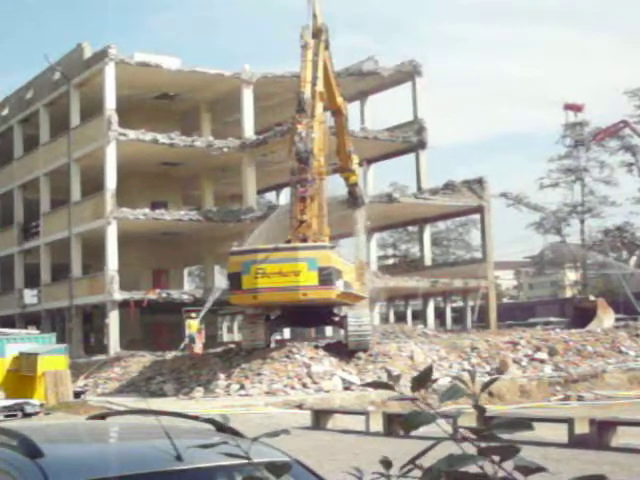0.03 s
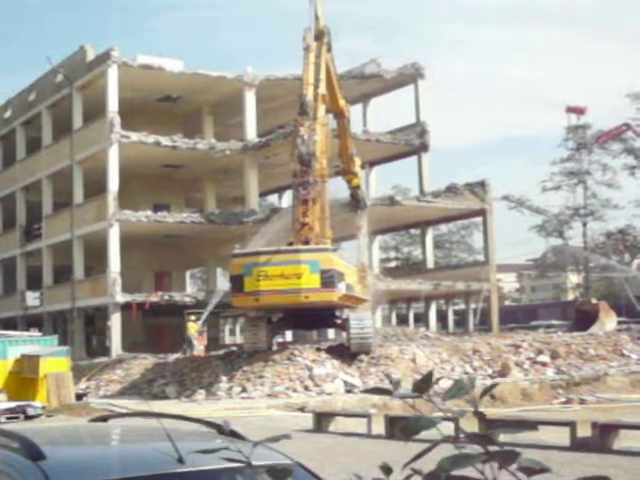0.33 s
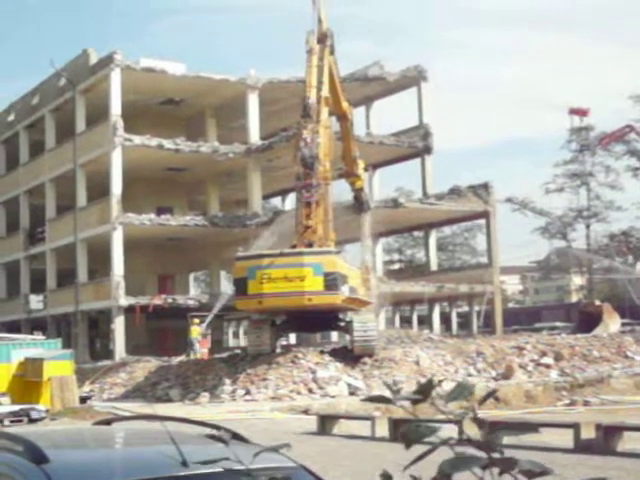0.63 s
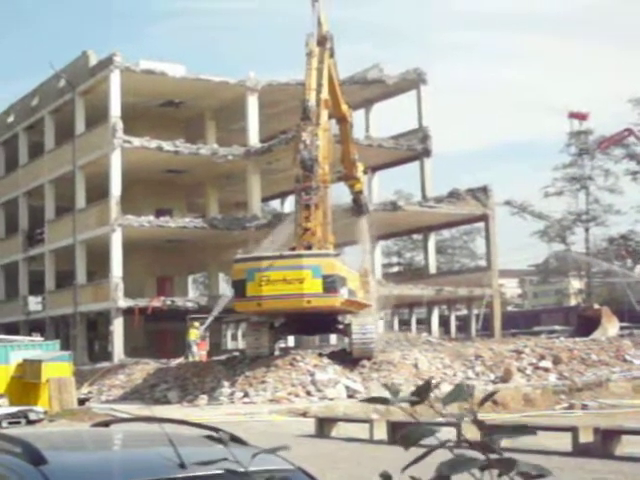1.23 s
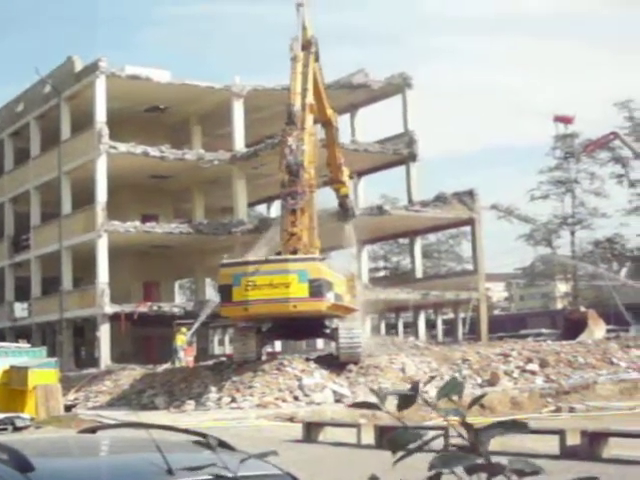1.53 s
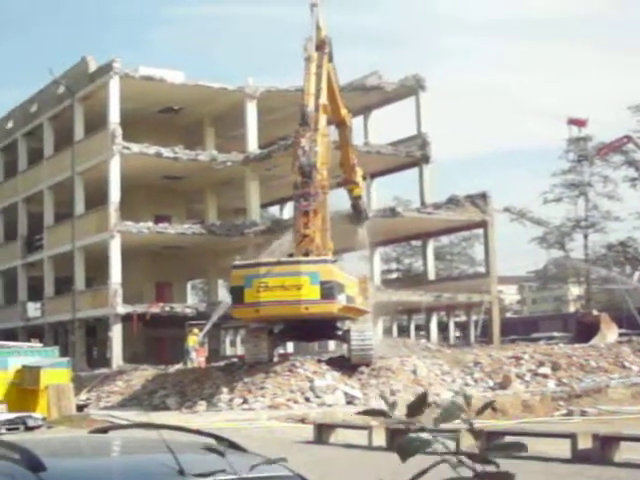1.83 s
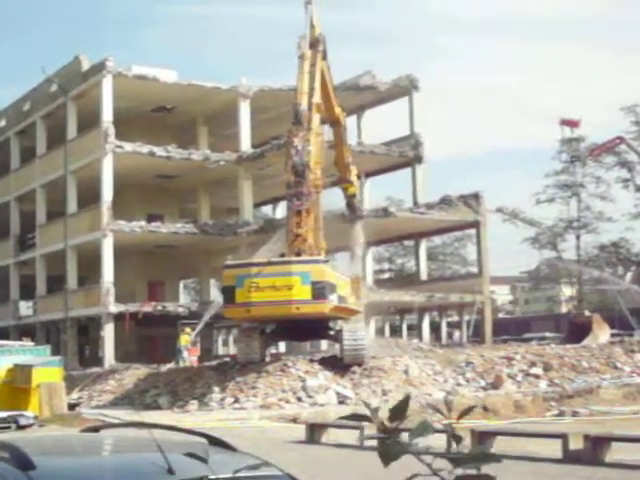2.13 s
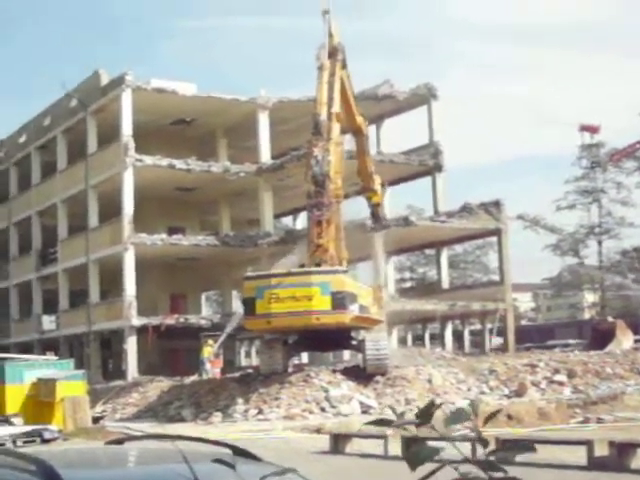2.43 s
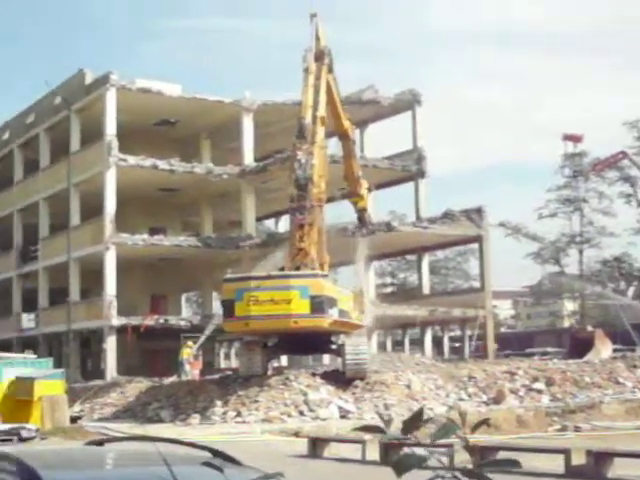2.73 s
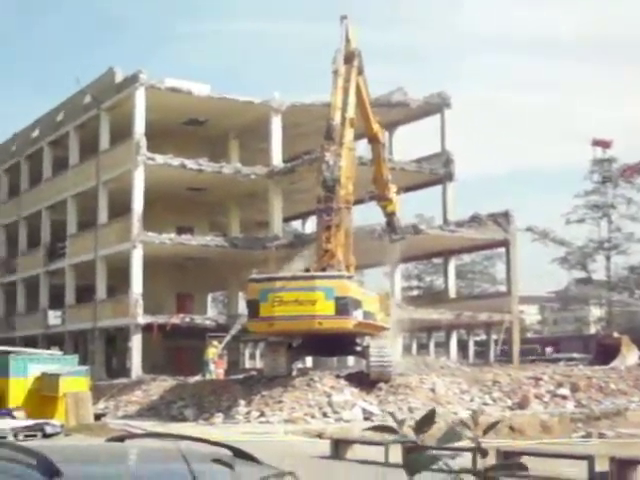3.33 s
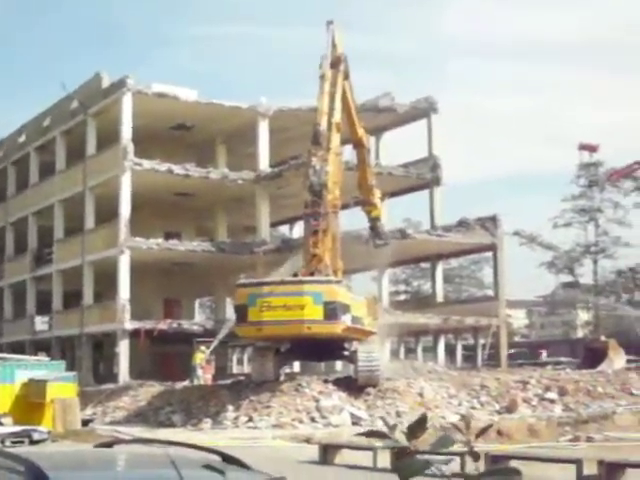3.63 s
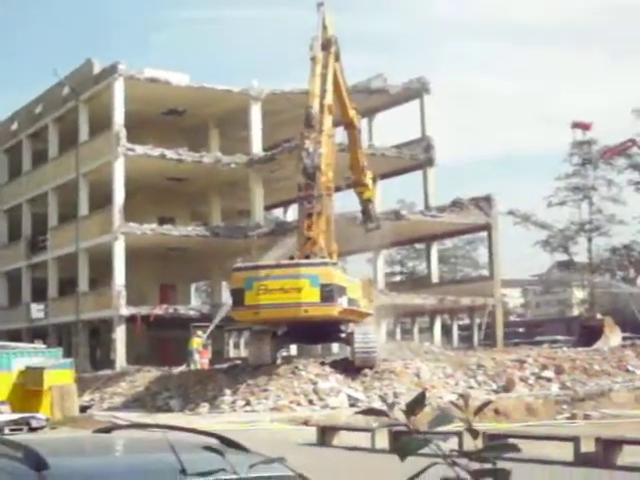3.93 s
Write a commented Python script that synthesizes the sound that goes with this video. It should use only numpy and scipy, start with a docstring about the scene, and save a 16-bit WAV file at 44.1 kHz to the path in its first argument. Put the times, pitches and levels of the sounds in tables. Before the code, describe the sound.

A big diesel excavator booms and clatters throughout over a low site rumble, revving slightly around 1 second. A broad roar, like sliding debris or traffic, peaks with a concrete crack at 0.4 seconds and again at 1.6. The arm squeals briefly at 1 second. Rubble clinks on steel, mostly after 2.2 seconds, and something clicks nearby at 2.5. The dull microphone overloads on the loudest peaks.

```python
"""Excavator on a concrete building

A big diesel excavator works, its exhaust booming as the load comes and goes; its arm squeals once.
A broad roar, of traffic or sliding debris, is there at the start and then surges twice. Rubble and
reinforcing steel clink in the open floors, and something clicks nearby. A small camera's
narrow-band microphone hears it all and overloads on the loudest peaks."""
import sys
import numpy as np
from scipy import signal
from scipy.fft import rfft, irfft
from scipy.io import wavfile
from scipy.ndimage import uniform_filter1d

SR = 44100
rng = np.random.default_rng(int(sys.argv[2]) if len(sys.argv) > 2 else 0)


def unload_wav(signal):
    """Save mono or channel-first audio to the path in sys.argv[1] as 16-bit WAV at rate SR, clipped to [-1, 1]."""
    wavfile.write(
        sys.argv[1],
        SR,
        np.round(np.clip(np.atleast_2d(signal).T, -1, 1) * 32767).astype(np.int16),
    )


N = 176400  # 4 seconds


def gain(db):
    """Turn decibels (dB) into a number to multiply by."""
    return 10 ** (np.asarray(db) / 20)


def normalize(x):
    """Scale a signal so its average strength (rms) is 1."""
    return x / np.sqrt(np.mean(x ** 2))


def curve(rows):
    """Join (seconds, value) points with straight lines."""
    return np.interp(np.arange(N) / SR, *np.array(rows).T)


def wobble(rate):
    """Glide smoothly to a new random value, rate times a second."""
    hold = int(SR / rate)
    steps = np.repeat(rng.standard_normal(1024), hold)[:N]
    return normalize(uniform_filter1d(uniform_filter1d(steps, hold), hold))


def noise(points):
    """Noise shaped by (Hz, dB) points, fading steeply beyond both ends."""
    hz, db = np.array(points).T
    f = np.maximum(np.fft.rfftfreq(N, 1 / SR), 1)
    shape = gain(np.interp(np.log(f), np.log(hz), db))
    shape = shape / (1 + (hz[0] / 2 / f) ** 4) / (1 + (f / 2 / hz[-1]) ** 4)
    return normalize(irfft(rfft(rng.standard_normal(N)) * shape, N))


def resonance(hz, width):
    """Noise that rings around one pitch; a smaller width rings more clearly."""
    peak = signal.iirpeak(hz, hz / width, fs=SR)
    return normalize(signal.lfilter(*peak, rng.standard_normal(N)))


def tone(phase, rough, flutter_hz):
    """A tone plus a fluttering part scattered by the walls; rough sets how much."""
    wave = (1 + rough * wobble(flutter_hz)) * np.sin(phase) + rough * wobble(flutter_hz) * np.cos(phase)
    return np.sqrt(2 / (1 + 2 * rough ** 2)) * wave


# The rumble's tone colour. Each row: frequency in Hz, relative level in dB.
RUMBLE_COLOUR = [(15,-11.5),(30,-6),(60,2.5),(120,3),(220,-1.5),(330,-1),(500,-23.5)]

def site_rumble():
    """The building site rumbles, low and steady."""
    return gain(-28) * noise(RUMBLE_COLOUR)


# The roar's swells. Each row: peak time in seconds, relative level in dB, rise and fall in dB a second.
SURGES = [(.04,-12.5,12,32),(.375,-7.2,66,29),(1.63,-13.3,75,46)]
# The roar's tone colour. Each row: frequency in Hz, relative level in dB.
ROAR_COLOUR = [(20,-8),(70,5.5),(150,-4),(300,-2),(450,-4),(700,0.5),(950,-3.5),(1200,1.5),(1500,-6.5),(2000,-12.5),(2800,-16),(3600,-18.5)]
# Pitches that ring in the roar. Each row: pitch in Hz, width in Hz, relative level in dB.
ROAR_RINGS = [(1125,15,-7),(1243,40,-9),(897,25,-15.5),(665,37,-14.5),(1426,120,-20)]

def roar():
    """Traffic or sliding debris makes a broad, ringing roar that swells and dies away."""
    t = np.arange(N) / SR
    power = sum(gain(db - np.abs(t - at) * np.where(t < at, rise, fall)) ** 2
                for at, db, rise, fall in SURGES)
    rush = noise(ROAR_COLOUR)
    rings = sum(gain(db) * resonance(hz, width) for hz, width, db in ROAR_RINGS)
    return gain(0.9) * np.sqrt(power) * normalize(rush + rings)


def concrete_crack(start_s=.345, attack_s=.018, fade_s=.39):
    """Concrete cracks in a burst of noise at the roar's biggest crest."""
    age = np.maximum(np.arange(N) / SR - start_s, 0)
    level = np.minimum(age / attack_s, 1) * gain(-11 - 60 * age / fade_s)
    return level * noise([(1000, -2.5), (1700, 12), (2600, -7), (3700, -5)])


# Rubble hitting steel. Each row: start in seconds, level in dB, pitch in Hz, seconds to fade by 60 dB.
CLINKS = [(.85,-25.5,3620,0.18),(1.145,-29,2660,0.11),(1.18,-26.5,2950,0.065),(1.26,-29,3320,0.087),(1.465,-30.5,2990,0.051),(2.222,-24,3330,0.091),(2.275,-26.5,2920,.2),(2.30,-26,3200,.1),(2.355,-28.5,2910,0.36),(2.43,-33,2880,0.24),(2.629,-20,3530,0.083),(2.787,-17.5,3400,0.032),(2.854,-22,3390,0.21),(2.867,-21.5,3433,0.095),(2.891,-15,3428,0.18),(2.913,-22.5,3620,0.12),(2.955,-21.5,3610,0.092),(2.966,-25.5,2785,0.39),(3.071,-27.5,2870,0.28),(3.155,-23,3246,0.15),(3.19,-28,2645,.2),(3.224,-27,2890,0.06),(3.30,-25,2760,0.08),(3.335,-27.5,2790,0.29),(3.58,-28.5,3530,0.13),(3.68,-26,3300,.07),(3.793,-30,2710,0.068)]
# The tones of a struck bar. Each row: multiple of the clink's pitch, relative level in dB.
BAR_TONES = [(.4,-7),(.635,-12.5),(.8,-8.5),(.935,-10.5),(1.001,-0.5),(1.055,-7)]

def rubble(attack_s=.0007, echo_s=.65):
    """Falling pieces crunch and set steel bars ringing; the open floors echo them."""
    t = np.arange(N) / SR
    grit = gain(-3.5) * noise([(700, -15.5), (1400, 0), (2200, -9.5), (3000, -1.5), (3800, -2.5)])
    hits = np.zeros(N)
    for at, db, hz, fade_s in CLINKS:
        start = int(at * SR)
        age = t[:min(SR // 2, N - start)]
        span = slice(start, start + len(age))
        ring = sum(np.sqrt(2) * gain(tone_db) * np.sin(2 * np.pi * (hz * ratio * age + rng.random()))
                   for ratio, tone_db in BAR_TONES)
        level = gain(db - 60 * age / fade_s) * (1 - np.exp(-age / attack_s))
        hits[span] += level * (ring + grit[span])
    echo = rng.standard_normal(SR) * gain(-60 * t[:SR] / echo_s)
    echo /= np.sqrt(np.sum(echo ** 2))
    return hits + gain(-8) * signal.fftconvolve(hits, echo)[:N]


def click(at_s=2.4795, width_s=.0005, tick_hz=3950, ring_hz=3530, fade_s=.05):
    """Something close by ticks once and rings briefly, with no echo."""
    t = np.arange(N) / SR - at_s
    tick = gain(-3.5) * np.exp(-(t / width_s) ** 2) * np.sin(2 * np.pi * tick_hz * t)
    age = np.maximum(t, 0)
    ring = gain(-23.5 - 60 * age / fade_s) * np.sin(2 * np.pi * ring_hz * age)
    return tick + ring


def arm_squeal(peak_s=1.01, width_s=.038, hz=943, fall_hz_per_s=700):
    """The working arm gives a short squeal that falls in pitch."""
    t = np.arange(N) / SR - peak_s
    phase = 2 * np.pi * np.cumsum(hz - fall_hz_per_s * t) / SR
    level = gain(-25) * np.exp(-(t / width_s) ** 2 / 2)
    return level * tone(phase, rough=.88, flutter_hz=60.6)


# Pitches at which the housing rings. Each row: pitch in Hz, width in Hz, level in dB.
HOUSING_RINGS = [(282,7.6,-31.5),(367.5,8.5,-37.5),(554.7,13,-36.5),(669,19,-39)]

def housing():
    """The machine's housing rings at a few fixed pitches."""
    return sum(gain(db) * resonance(hz, width) for hz, width, db in HOUSING_RINGS)


# The tone colour of the clatter and fan. Each row: frequency in Hz, relative level in dB.
CLATTER_COLOUR = [(300,-7.5),(370,-6),(450,-9),(540,2.5),(640,-5.5),(760,-2.5),(900,-3.5),(1080,0.5),(1300,-4),(1600,-8.5),(2200,-13),(2900,-12),(3600,-14)]

def clatter(phase):
    """Clatter and fan noise pulse with each firing and flicker slightly in level."""
    flicker = gain(.6 * wobble(18))
    pulse = 1 + .15 * np.cos(phase)
    return gain(-21.5) * noise(CLATTER_COLOUR) * pulse * flicker


# How loud four engine tones are over time. Each row: time in seconds, relative level in dB.
BOOM_LEVEL = [(0.0, -8.5), (0.05, -17), (0.17, -6), (0.32, -9), (0.37, -20), (0.4, -17), (0.43, -29),
              (0.5, -12.5), (0.59, -12.5), (0.67, -11.5), (0.72, -29), (0.79, -14), (0.87, -18),
              (0.95, -13.5), (1.02, -14.5), (1.2, -16.5), (1.32, -25.5), (1.4, -11), (1.46, -10),
              (1.68, -8.5), (2.09, -8), (2.62, -15.5), (2.78, -14.5), (3.03, -20.5), (3.09, -19.5),
              (3.17, -10), (3.35, -7.5), (3.46, -20), (3.54, -9), (3.69, -7), (3.98, -10.5), (4.0, -9)]
SECOND_LEVEL = [(0.0, -24.5), (0.23, -32), (0.33, -26), (0.47, -36.5), (0.49, -23), (1.07, -41.5),
                (1.97, -25.5), (2.08, -28.5), (2.53, -24), (3.31, -36.5), (3.33, -29), (4.0, -26)]
THIRD_LEVEL = [(0.0, -36), (0.05, -17.5), (0.15, -41), (0.27, -15), (0.5, -45), (1.11, -13.5), (1.3, -44),
               (1.56, -19.5), (1.59, -34), (2.32, -33.5), (2.41, -19), (2.58, -37), (3.35, -18.5),
               (3.56, -36), (3.66, -20.5), (4.0, -30.5)]
WHINE_LEVEL = [(0.0, -23.5), (0.76, -18), (1.0, -30), (1.07, -19), (1.24, -20.5), (1.26, -24.5),
               (1.95, -28.5), (2.04, -18.5), (2.32, -31), (2.49, -33), (2.55, -53), (2.83, -45),
               (3.03, -21), (3.16, -35), (3.25, -21), (3.68, -31), (3.71, -26), (4.0, -22.5)]
# Weaker engine tones. Each row: multiple of the firing rate, level in dB.
OVERTONES = [(1.5,-47.5),(2.5,-46),(3.5,-49),(4,-43),(4.5,-40),(5,-44.5),(5.5,-45),(7,-40),(8,-39.5),(9,-38.5),(10.5,-38.5),(12,-37.5),(13,-38),(15,-37)]

def engine_tones(phase):
    """The exhaust booms at the firing rate; a whine and other tones waver at multiples of it."""
    tones = gain(curve(BOOM_LEVEL) + .3) * tone(phase, rough=.069, flutter_hz=12)
    tones += gain(curve(SECOND_LEVEL) + 3) * tone(2 * phase, rough=.22, flutter_hz=22)
    tones += gain(curve(THIRD_LEVEL) - 3.5) * tone(3 * phase, rough=.36, flutter_hz=20)
    tones += gain(curve(WHINE_LEVEL) - .6) * tone(6 * phase, rough=.28, flutter_hz=20)
    for multiple, db in OVERTONES:
        tones += gain(db) * tone(multiple * phase, rough=1, flutter_hz=14)
    return tones


# How fast the engine runs. Each row: time in seconds, firings per second.
FIRING_RATE = [(0.0, 86.0), (0.17, 84.9), (0.35, 86.1), (0.62, 86.4), (0.78, 91.1), (0.9, 92.9),
               (1.05, 92.7), (1.24, 91.2), (1.38, 86.1), (1.58, 84.7), (2.0, 86.1), (2.5, 87.6),
               (2.97, 89.2), (3.12, 86.6), (3.27, 84.0), (3.46, 85.9), (3.64, 84.4), (4.0, 86.9)]

def engine():
    """The diesel's cylinders fire in turn, setting the pace of its tones and clatter."""
    rate = uniform_filter1d(curve(FIRING_RATE), size=2205)  # smoothed over 0.05 seconds
    phase = 2 * np.pi * np.cumsum(rate) / SR  # one full turn per firing
    return engine_tones(phase) + housing() + clatter(phase)


def scene():
    """Add the machine, the site and the debris together in one channel."""
    mix = engine() + site_rumble() + arm_squeal() + roar() + concrete_crack() + rubble() + click()
    return mix[None]


def record(dry, treble_hz=3587, band_edge_hz=4350, top_hz=15900, knee=.55, headroom=.22, limit=.7046):
    """The small microphone loses the high treble and squashes the loudest peaks."""
    x = signal.sosfilt(signal.butter(14, treble_hz, fs=SR, output="sos"), dry)
    excess = np.maximum(np.abs(x) - knee, 0)  # only the part above the knee is rounded off
    x = np.clip(x, -knee, knee) + np.sign(x) * headroom * np.tanh(excess / headroom)
    x = signal.sosfiltfilt(signal.ellip(8, .1, 60, band_edge_hz, fs=SR, output="sos"), x)
    x = np.clip(x, -limit, limit)  # whatever still sticks out is cut flat
    return signal.sosfilt(signal.ellip(8, .2, 70, top_hz, fs=SR, output="sos"), x)


dry = scene()
out = record(dry)
unload_wav(out)
```